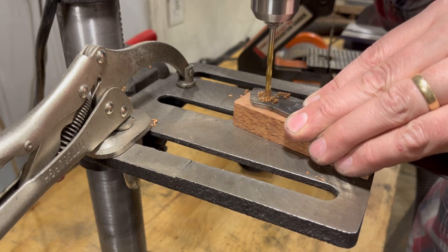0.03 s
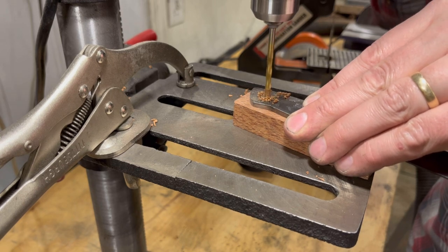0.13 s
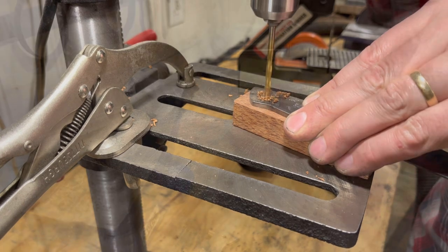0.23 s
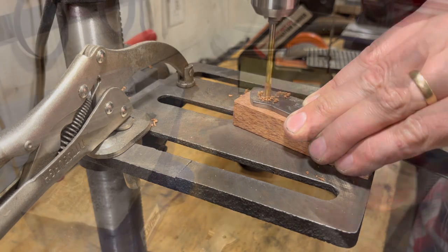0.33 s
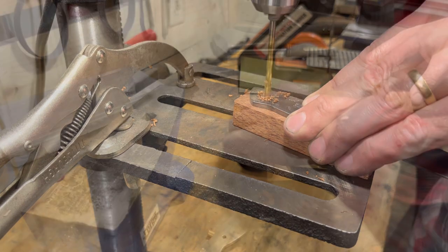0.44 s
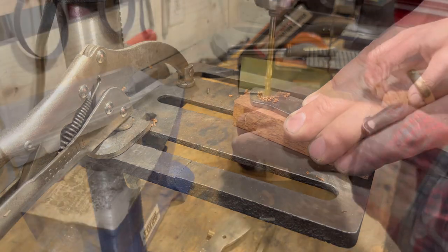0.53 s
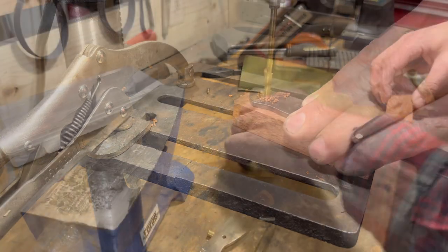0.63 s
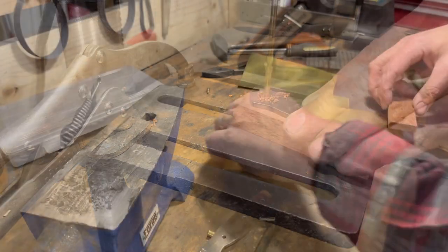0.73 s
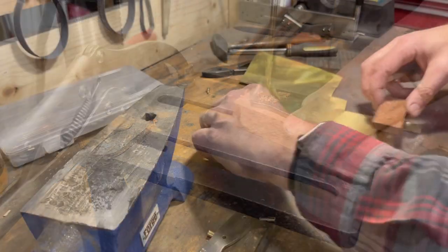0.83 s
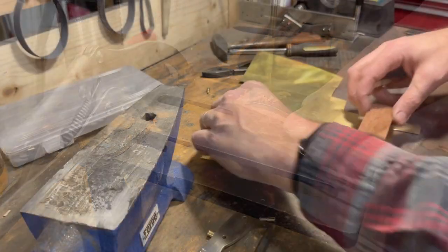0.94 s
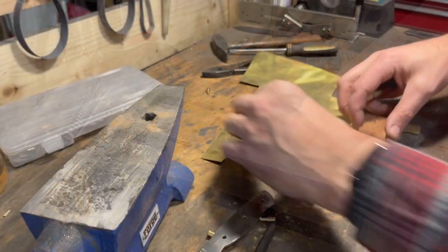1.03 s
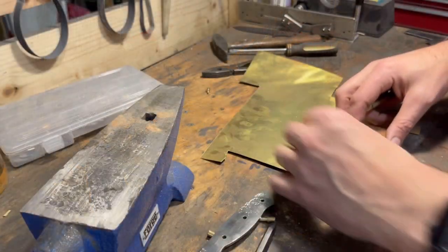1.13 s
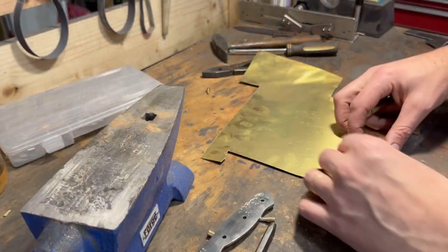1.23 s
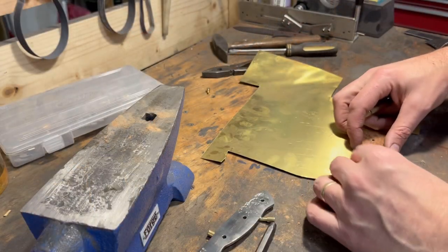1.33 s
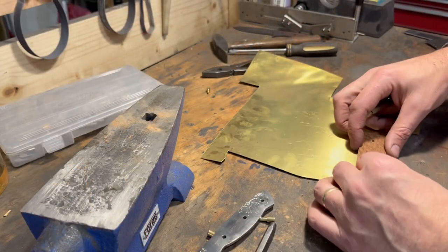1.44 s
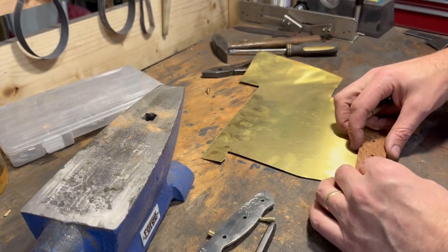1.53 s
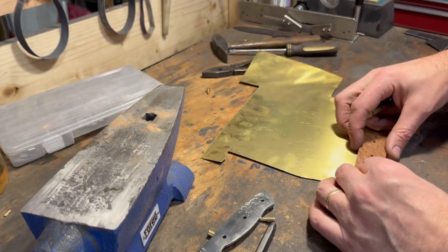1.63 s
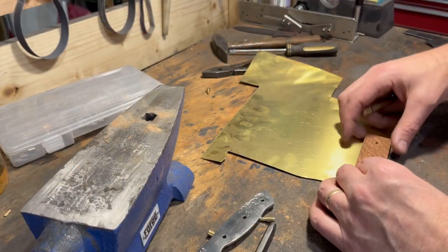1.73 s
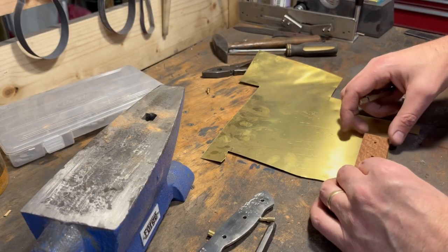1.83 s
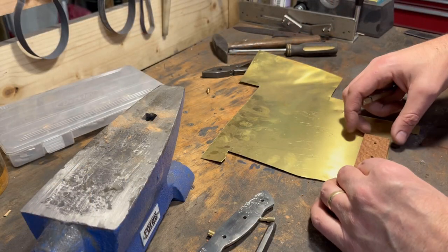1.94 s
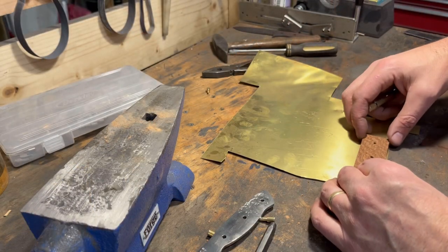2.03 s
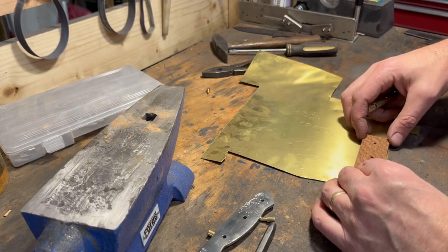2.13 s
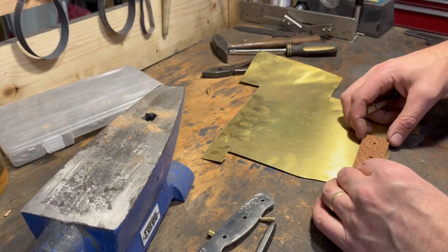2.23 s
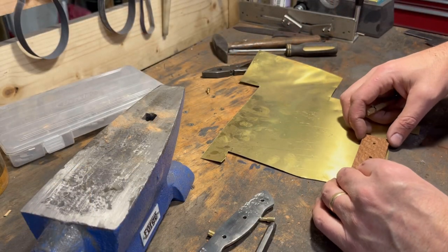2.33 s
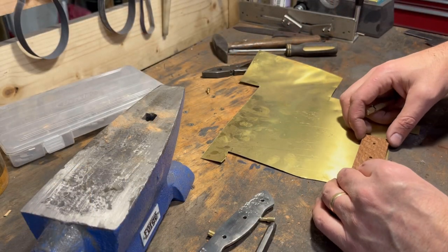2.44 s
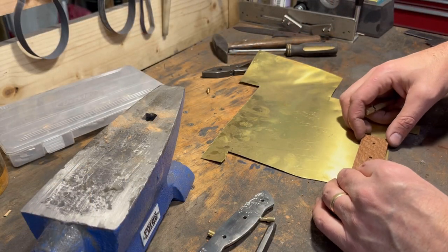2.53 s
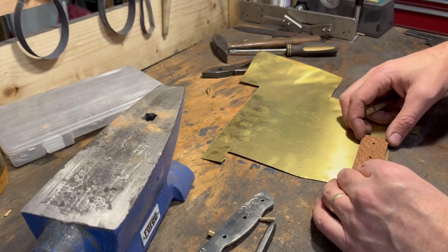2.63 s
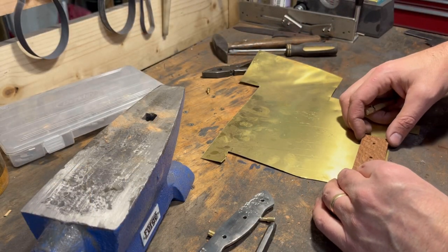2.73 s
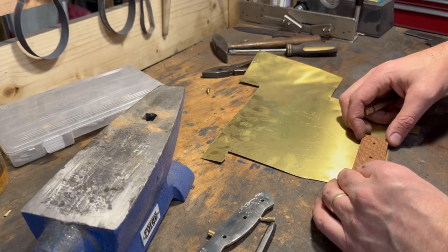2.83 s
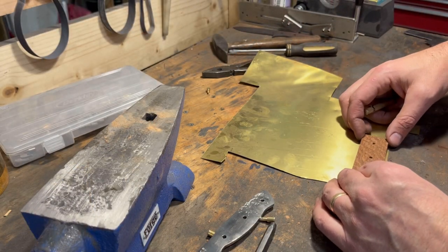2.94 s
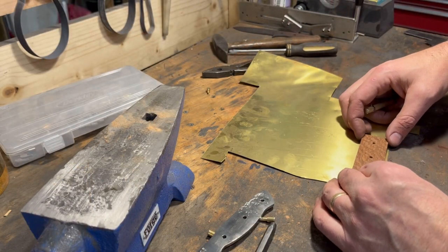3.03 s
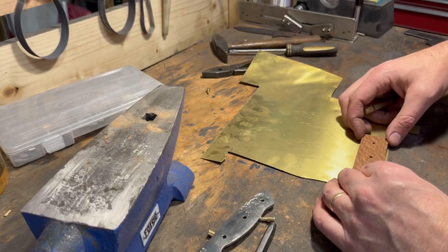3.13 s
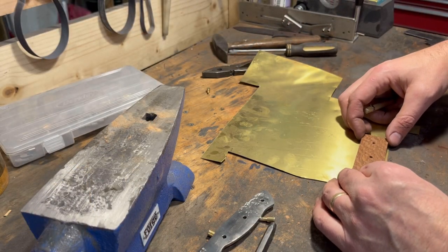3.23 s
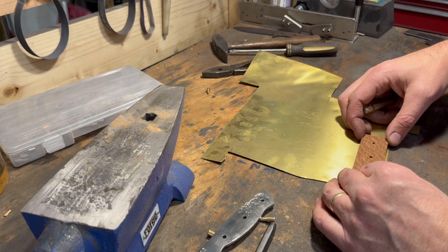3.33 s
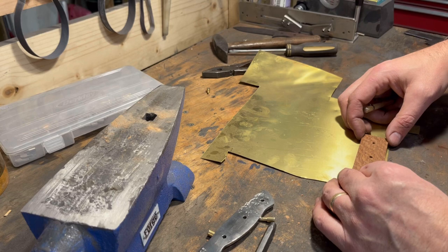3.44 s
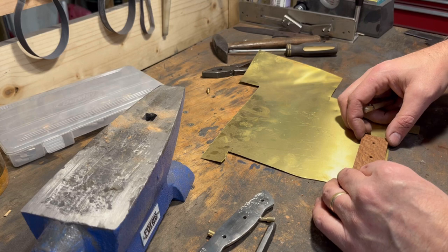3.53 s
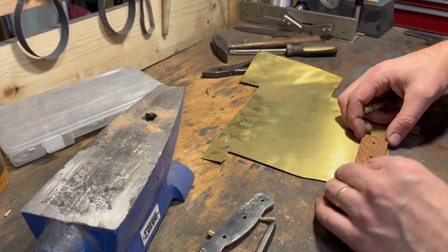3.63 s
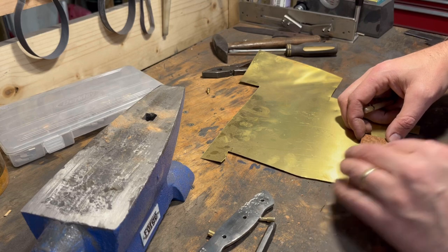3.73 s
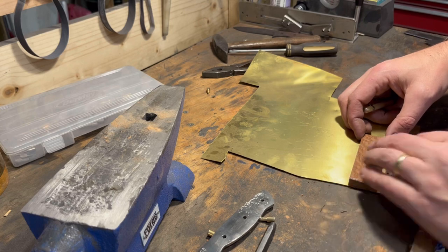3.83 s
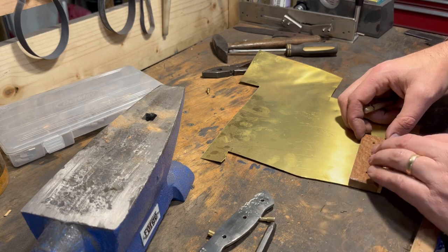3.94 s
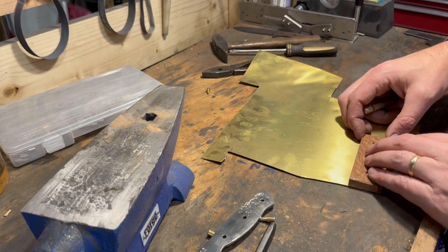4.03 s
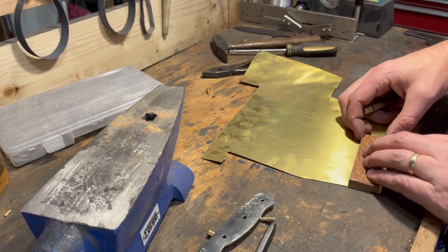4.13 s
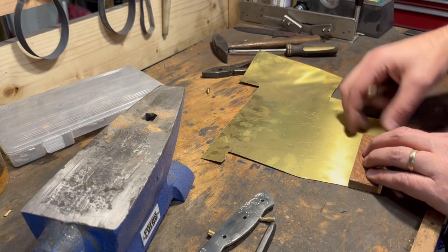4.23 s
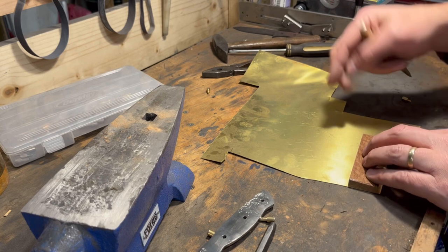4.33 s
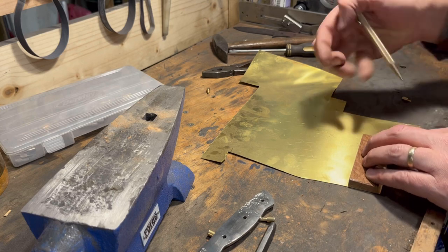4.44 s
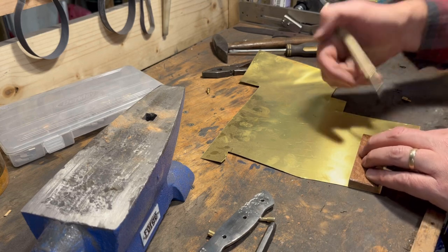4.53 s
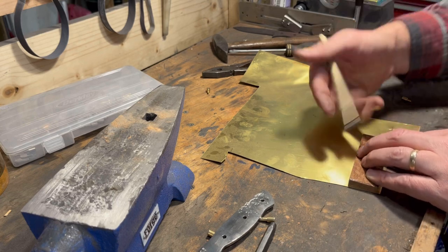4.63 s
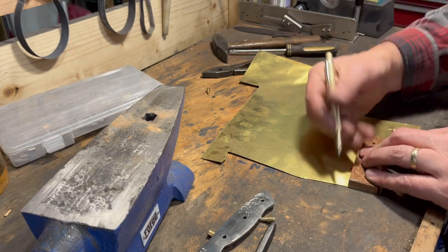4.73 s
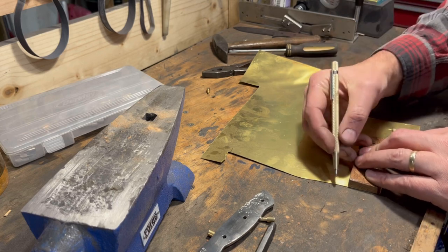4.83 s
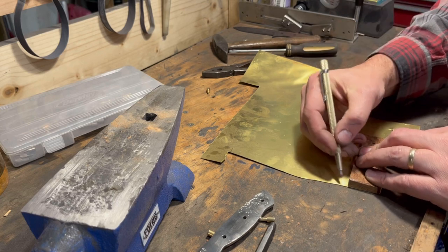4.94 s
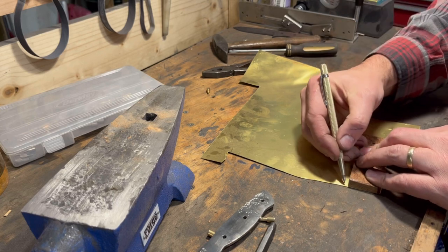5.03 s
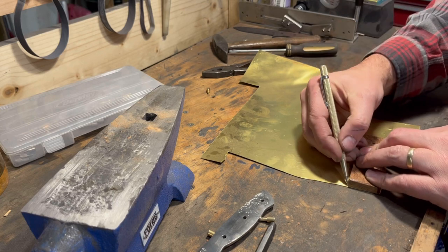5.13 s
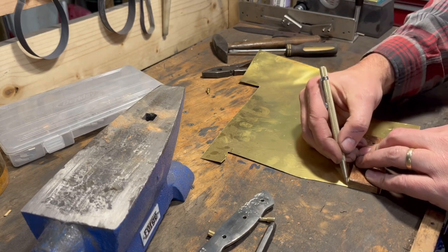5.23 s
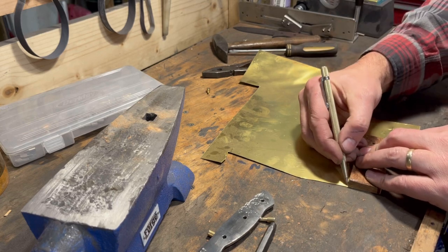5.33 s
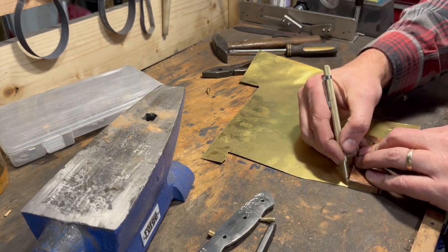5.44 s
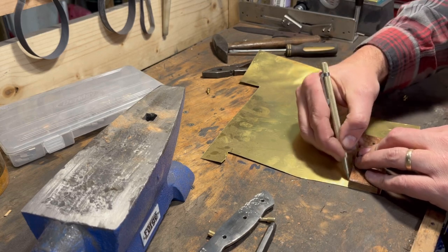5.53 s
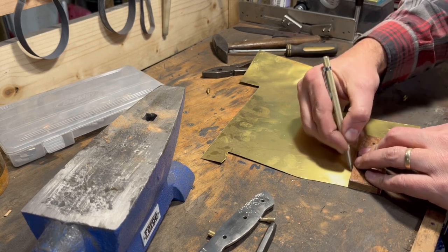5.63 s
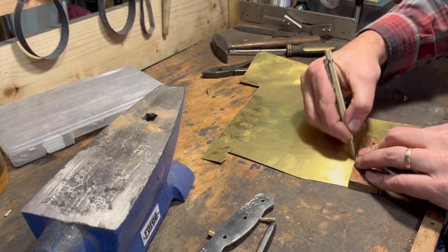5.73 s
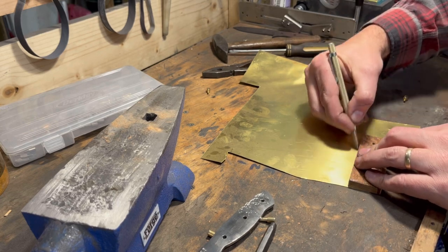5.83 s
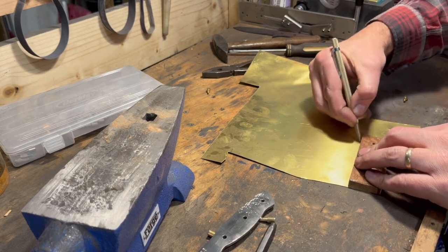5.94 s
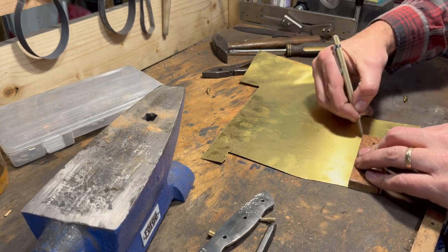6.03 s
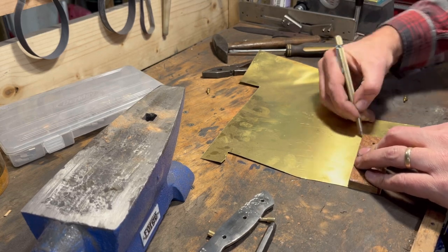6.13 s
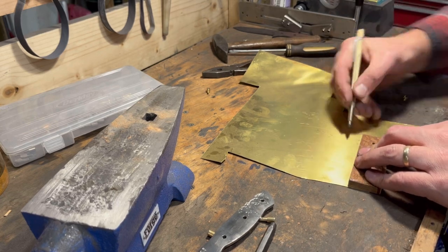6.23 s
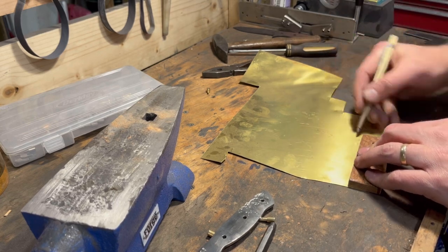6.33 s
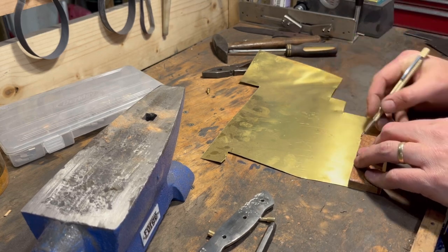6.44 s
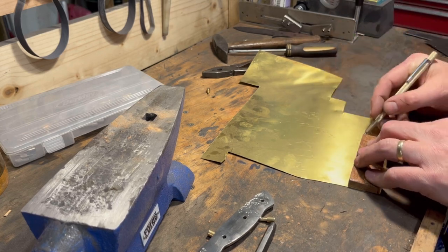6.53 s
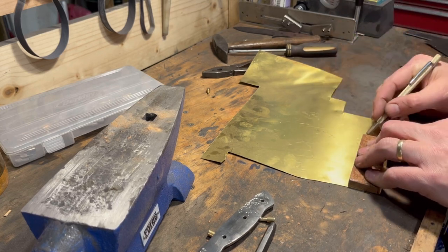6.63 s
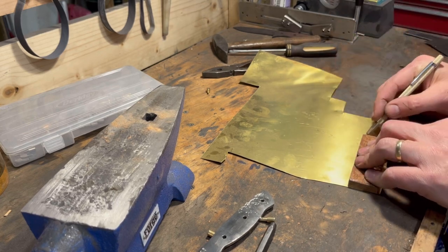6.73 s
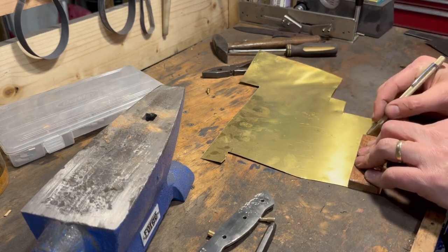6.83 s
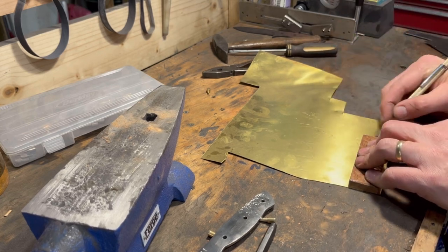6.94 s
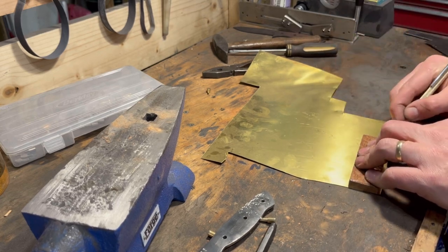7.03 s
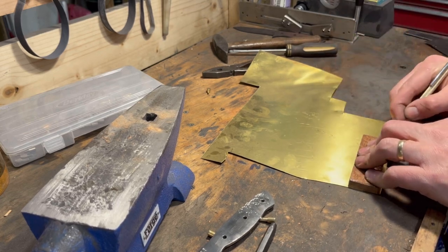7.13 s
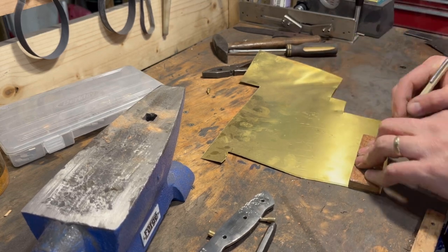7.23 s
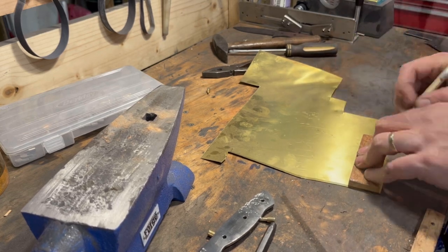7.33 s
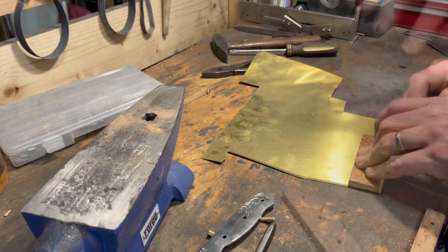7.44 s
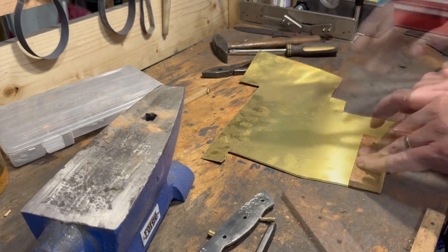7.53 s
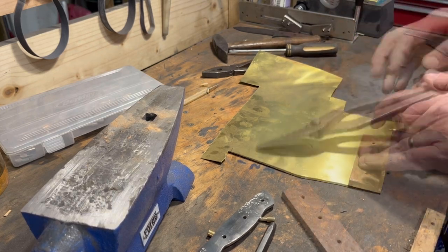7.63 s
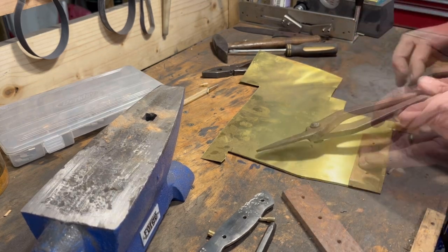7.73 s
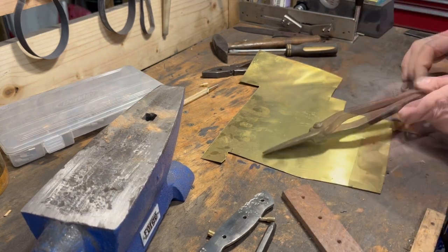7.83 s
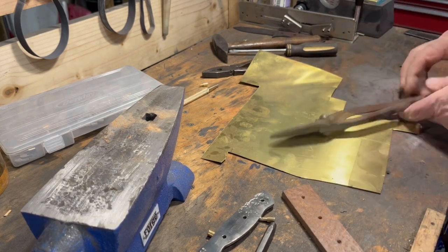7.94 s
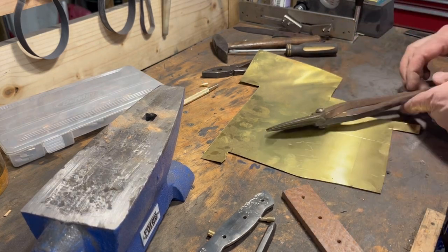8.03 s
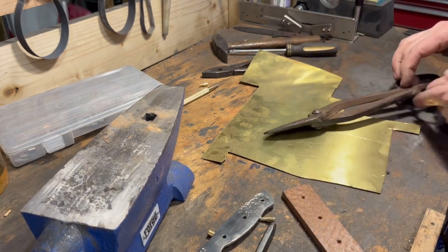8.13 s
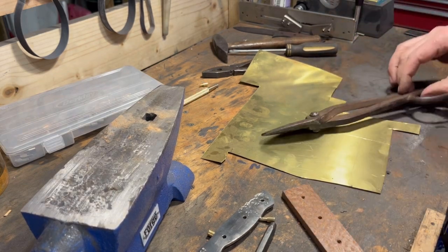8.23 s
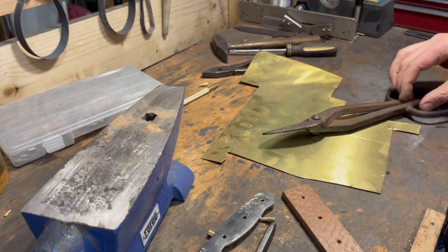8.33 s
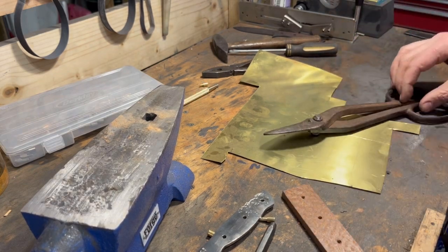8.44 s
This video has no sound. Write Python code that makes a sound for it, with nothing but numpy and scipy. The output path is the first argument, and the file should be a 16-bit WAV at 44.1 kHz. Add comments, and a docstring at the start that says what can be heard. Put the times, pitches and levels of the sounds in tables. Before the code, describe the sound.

In a quiet workshop, a small drill press drones and growls while its bit crunches through a wooden block, then cuts off sharply. Soft knocks and shuffles follow on the bench, a steel scriber scrapes and squeals briefly on brass, the block is tapped and slid, something drags harshly over the sheet, and a tool lands with a loud clunk. Close stereo microphone, short room echo.

```python
"""A small drill press hums and bites into a wooden block, then stops short: tones, filtered noise, grains.
Knocks ring block and bench modes; two clinks ring steel and a brass sheet.
Hands shift things about, a steel scriber scrapes and squeals on brass, something drags over the sheet:
friction grains through spectra and resonators. Cloth swishes as shaped noise.
A quiet workshop with echoes and still air, heard by a pair of microphone ports."""
import sys
import numpy as np
from scipy import signal
from scipy.fft import rfft, irfft, next_fast_len
from scipy.io import wavfile

SR = 44100
rng = np.random.default_rng(int(sys.argv[2]) if len(sys.argv) > 2 else 0)


def generate_wav(sig):
    """Save sig (samples, or channels by samples) to the path in sys.argv[1] as 16-bit PCM at SR."""
    pcm = np.round(np.clip(np.atleast_2d(sig).T, -1, 1) * 32767).astype(np.int16)
    wavfile.write(sys.argv[1], SR, pcm)


N = 373968
SIZE = next_fast_len(N + SR)  # transform length

# Still room air. Each row: frequency in Hz, relative density in dB per Hz.
AIR_SPECTRUM = [(25, -29.5), (65, -2.5), (147, -13.5), (293, -24), (446, -29), (849, -33.5), (1040, -45.5),
                (1730, -36.5), (2010, -48.5), (5000, -63.5), (9000, -72), (15200, -52.5), (17000, -69)]
# Air level: shared part in dB, unshared part in dB.
AIR_LEVELS_DB = (-56, -51.5)
# Room decay. Each row: frequency in Hz, t60 in s at scale 1.
ROOM_T60 = [(80, 0.13), (250, 0.3), (600, 0.48), (1500, 0.12), (4000, 0.32), (10000, 0.065)]
ROOM_DB = -6

# Left-right likeness of the ports. Each row: frequency in Hz, likeness 0 to 1.
LIKENESS = [(60, 0.97), (130, 1), (290, 0.86), (640, 0.57), (1400, 0.45), (3100, 0.74)]
# The same above the bass and mids. Each row: frequency in Hz, likeness 0 to 1.
TREBLE_LIKENESS = [(6000, .95), (16000, .97)]
# Level difference. Each row: frequency in Hz, left minus right in dB.
PORT_LEAN = [(60, 0.5), (110, -3.5), (200, -2), (380, -1.5), (700, 1.5), (1290, 0), (2380, 0), (4400, 5.5),
             (8120, 0), (15000, -0.5)]
# Phase difference. Each row: frequency in Hz, lead of left in radians.
PORT_LEAD = [(0, 0), (780, .4), (1600, -.9), (2100, -.1), (4500, .3), (5250, -.3), (5900, -2.2),
             (6600, -3.15), (8350, -6.2), (10000, -6.4), (11800, -9.3), (13800, -9.5), (14600, -12.3),
             (16000, -12.7)]
SELF_NOISE_DB, LOW_CUT_HZ, HIGH_CUT_HZ = -87, 59.5, 16300

# Cloth colour. Each row: frequency in Hz, relative density in dB per Hz.
CLOTH_SPECTRUM = [(3000, -11), (6000, -6), (9000, -1.5), (13000, 0), (16000, -6.5)]
# Cloth swishes. Each row: start in s, rise in s, fall in s, level in dB.
SWISHES = [(4.05, 0.47, .07, -68), (4.583, 0.039, 0.12, -68), (4.76, 0.027, 0.2, -63)]

# Bench rumble colour. Each row: frequency in Hz, relative density in dB per Hz.
RUMBLE_SPECTRUM = [(25, -46), (50, -19), (85, 4), (130, -0.5), (250, -6.5), (400, -15), (16000, -49)]
# Block rubbing colour. Each row: frequency in Hz, relative density in dB per Hz.
RUBBING_SPECTRUM = [(100, -16), (300, 5), (600, 2), (1000, 4), (1600, -5.5), (2600, -14), (16000, -90)]
# Skin and brass rustle colour. Each row: frequency in Hz, relative density in dB per Hz.
RUSTLE_SPECTRUM = [(600, -34), (1500, -2.5), (2500, -1), (4500, -4.5), (5600, -4.5), (7600, -4.5),
                   (9000, -10.5), (12000, -9), (16000, -20.5)]
# Hands slide things. Each row: start in s, rise in s, fall in s,
# drive of bench rumble, block rubbing and skin and brass rustle in dB.
SLIDES = [(1.162, 0.0031, 0.044, -65.5, -65, -63), (1.211, 0.0051, 0.093, -42.5, -49, -60.5),
          (1.25, 0.098, 0.28, -63, -81, -68), (1.6, 0.096, 0.071, -81, -67, -63),
          (1.74, 0.058, 0.19, -68, -75, -62), (1.9, 0.058, 0.12, -62.5, -53, -68),
          (2.193, 0.065, 0.027, -78.5, -55.5, -67), (2.428, 0.037, .035, -88, -69, -75.5),
          (2.7, 0.052, 0.03, -90, -82, -75.5), (2.889, 0.05, 0.039, -88, -75, -76),
          (3.009, 0.056, 0.018, -74, -66, -75), (3.573, 0.066, 0.052, -78, -60, -63),
          (4.125, 0.015, 0.17, -58, -71, -68), (4.799, 0.0065, 0.27, -58, -65, -69),
          (5.427, 0.23, 0.48, -40, -39, -58), (5.6, 0.18, 0.206, -44.5, -47, -58),
          (5.955, 0.038, 0.045, -65.5, -45.5, -55), (6.09, 0.059, 0.071, -60, -58.5, -62.5),
          (6.873, 0.049, 0.14, -50, -39, -55), (6.93, 0.082, 0.11, -34.5, -37.5, -70),
          (7.123, 0.056, 0.0092, -49, -38.5, -54), (7.24, 0.03, 0.23, -58, -56.5, -64),
          (7.4, 0.31, 0.043, -64, -65, -63), (7.646, 0.0415, 0.15, -36, -33, -44),
          (7.8, 0.04, 0.091, -36, -37.5, -45), (7.86, 0.12, 0.1, -43, -46.5, -50),
          (8.199, 0.087, 0.0078, -49.5, -53, -53), (8.42, 0.0301, 0.0279, -36.5, -54, -83)]
SWELL_POWER = 1.125  # roundness of a swell
# Loose things shake on after a knock: levels against its thud, block and crack.
SHAKE_RUMBLE_DB, SHAKE_RUBBING_DB, SHAKE_RUSTLE_DB = -21.5, -22, -32.5
SHAKE_RISE_S, SHAKE_FADE_DB_PER_S = 0.004, 229
LINGER_DB, LINGER_FADE_DB_PER_S = -17, 47.5  # slower remainder

# Scriber strokes, one list each. Each row: time in s, pressure in dB.
SCRIBER_STROKES = [
    [(5.42, -97), (5.5, -64), (5.67, -55), (5.9, -71), (5.952, -82.5), (5.964, -51.5), (6.01, -57),
     (6.04, -75), (6.08, -84)],
]
# Scriber resonances. Each row: centre in Hz, width in Hz, relative level in dB.
SCRIBER_RING = [(4320, 500, -2.5), (7070, 280, -4), (10720, 570, -2)]
# Drags over the sheet, one list each. Each row: time in s, pressure in dB.
DRAG_STROKES = [
    [(7.652, -70), (7.665, -50.5), (7.72, -40.5), (7.79, -63), (7.815, -45), (8.04, -97), (8.07, -73)],
]
# Drag resonances. Each row: centre in Hz, width in Hz, relative level in dB.
DRAG_RING = [(1950, 160, 0), (2520, 140, -1), (3220, 260, -2), (4250, 260, -5)]
# Scriber tip squeals. Each row: start in s, rise in s, fall in s, pitch in Hz, level in dB.
SQUEALS = [(5.45, 0.19, 0.064, 2440, -54), (5.66, 0.039, 0.19, 2170, -47.5),
           (5.97, 0.032, 0.041, 2240, -52)]
SQUEAL_WIDTH_HZ = 170  # sets both ring times

# Knocks. Each row: time in s, drive of block, bench thud and crack in dB,
# favoured thud pitch in Hz, favoured block pitch in Hz.
KNOCKS = [(1.219, -31, -64, -38, 120, 2500), (1.979, -49, -49, -42, 113.7, 1033),
          (3.055, -45, -46, -82, 176, 552), (4.126, -41, -42.5, -50, 182, 613),
          (4.195, -41.5, -40.5, -50.5, 96.3, 494), (4.27, -46.5, -41.5, -74, 154, 610),
          (4.375, -52, -49.5, -47, 132.7, 423), (4.53, -47.5, -51.5, -48.5, 116.6, 720),
          (4.539, -55, -31.5, -56, 94, 551), (4.761, -45.5, -36.5, -62, 127, 616),
          (4.799, -31, -28.5, -37.5, 95, 915), (5.114, -34.5, -71, -53, 134, 690),
          (5.195, -23.5, -28, -35.5, 217, 1110), (5.384, -38.5, -41, -83, 175, 417),
          (6.138, -40, -40, -42, 109.7, 788), (6.366, -34, -51, -36, 140, 870),
          (6.389, -19, -67, -28.5, 234, 850), (6.432, -62, -24.5, -51, 94.5, 732),
          (6.484, -31.5, -48, -65, 105, 664), (6.567, -18, -26, -29, 283, 695),
          (6.605, -29.5, -35, -43.5, 330, 810), (6.887, -35.5, -35, -38, 127, 740),
          (7.146, -31, -40, -42, 111, 1050), (7.166, -17, -17.5, -16, 319, 1530),
          (7.172, -17, -14.5, -20, 195, 840), (7.656, -33, -78, -21.5, 121, 855),
          (7.991, -47, -57, -23.5, 200, 2200), (8.044, -31, -34, -56, 100.7, 720),
          (8.1053, -23, -35.5, -24.5, 298, 2130), (8.16, -59, -30, -64, 118.5, 500),
          (8.263, -5, -15, -10, 222.7, 1040), (8.265, -12, -5, -45, 200, 545),
          (8.412, -23, -51.5, -32, 150, 1810), (8.435, -13.5, -25, -27.5, 206, 1350),
          (8.445, -16.5, -20.5, -71, 145, 724)]
# Wooden block modes. Each row: frequency in Hz, relative strength in dB, t60 in s.
BLOCK_MODES = [(322, 6.5, 0.048), (520, 2, 0.026), (651, -6, 0.051), (716, 3, 0.035), (820, 3, 0.024),
               (1031, -0.5, 0.038), (1206, -7, 0.031), (1490, 0, 0.014), (1870, -3.5, 0.02),
               (2296, -0.5, 0.019), (3100, -6.5, 0.0085), (4370, 3.5, 0.024)]
# Bench modes. Each row: frequency in Hz, relative strength in dB, t60 in s.
BENCH_MODES = [(76.2, 2, 0.21), (101.5, 2.5, 0.13), (119.3, -2.5, .1), (144.9, -1.5, 0.1), (176, 3, 0.0678),
               (231.4, -3.5, 0.074), (263.7, -2, 0.23), (342, 4.5, 0.077)]
# Steel tool modes. Each row: frequency in Hz, relative strength in dB, t60 in s.
STEEL_MODES = [(8479, 0, .16), (10200, -4, .11), (11280, -2, .12), (14200, -5, .1)]
# A steel tool lands on the sheet. Each row: time in s, steel peak in dB, sheet peak in dB.
CLINKS = [(7.173, -43, -40), (8.268, -35, -23)]
SHEET_HZ, SHEET_T60_S, SHEET_DB_PER_OCTAVE = (600, 3600), 0.4, -11  # span of its dense modes
CONTACT_S, CRACK_S = 0.0037, 0.0045  # e-folding times of block push and crack
FIRST_TOUCH = 7.9  # opening click against the scuffle after it
PAD_CYCLES = 0.83  # bench push and rebound, in periods of the thud
SOFTNESS = 4.1  # low-pass corner of a blow over its block pitch

# Motor and spindle tones. Each row: frequency in Hz, typical level in dB rms.
MOTOR_TONES = [(119.5, -37.5), (240.5, -40), (649.5, -44.5), (768.7, -31), (840, -50), (1008, -45)]
# Housing rumble colour. Each row: frequency in Hz, relative density in dB per Hz.
HOUSING_SPECTRUM = [(30, -6), (60, -7), (90, -1), (180, -14), (480, -6.5), (650, -2.5), (1400, -14.5),
                    (2500, -21.5), (16000, -51.5)]
# Feed pressure, as housing rumble. Each row: time in s, level in dB.
FEED = [(0.0, -39), (0.11, -33.5), (0.16, -33.5), (0.3, -34.5), (0.44, -36), (0.634, -30), (0.78, -31.5),
        (0.876, -33.5), (1.16, -35)]
# Cutting grit colour. Each row: frequency in Hz, relative density in dB per Hz.
CUTTING_SPECTRUM = [(300, -29.5), (1000, -7.5), (2500, 1), (4500, 1), (6500, 3.5), (9000, -8.5),
                    (12000, -13.5), (16000, -20.5)]
# Cutting grit drive. Each row: time in s, level in dB.
GRIT = [(0, -41.5), (.07, -45), (.13, -50.5), (.16, -31), (.272, -45.5), (.295, -24), (.35, -31),
        (.434, -39.5), (.57, -40), (.59, -33), (.78, -37), (.806, -28), (.886, -43.5), (1.16, -44.5)]
# Chips break. Each row: time in s, level before fading in dB, e-folding time in s, pitch in Hz.
CHIPS = [(0.089, -23, 0.0065, 1260), (0.163, -25, 0.01, 2950), (0.352, -33, 0.014, 2050),
         (0.603, -33.5, 0.021, 1220), (0.678, -25.5, 0.0092, 676), (0.926, -33.5, 0.0046, 7200),
         (0.957, -36.5, 0.0055, 7150), (0.99, -31.5, 0.0047, 7100), (1.023, -30.5, 0.0035, 7500),
         (1.065, -30.5, 0.0096, 5600)]
# Bit resonances. Each row: centre in Hz, width in Hz.
BIT_RING = [(4111, 26), (4254, 16), (4430, 20), (4994, 27), (5388, 16)]
BIT_RING_DB = 17.5  # times the square of the grit gain
GROWL_HZ, GROWL_WIDTH_HZ, GROWL_DB = 343.8, 73, -40  # level at mean feed
GROWL_DB_PER_FEED_DB = 1.66
DRILL_STOP_S, STOP_FADE_S = 1.158, 0.00147


def from_db(db):
    """Gain of a level in dB."""
    return 10 ** (np.asarray(db) / 20)


def rms_one(x):
    """Scale to rms 1."""
    return x / np.sqrt(np.mean(x ** 2) + 1e-20)


def noise():
    """White noise of scene length."""
    return rng.standard_normal(N)


def in_time(rows):
    """Gain in time from rows of s and dB, near silent outside them."""
    time_s, level_db = np.transpose(rows)
    return from_db(np.interp(np.arange(N) / SR, time_s, level_db, left=-150, right=-150))


def at_hz(points, hz):
    """Table read on a log-frequency axis."""
    table_hz, values = np.array(points).T
    return np.interp(np.log(hz + 1), np.log(table_hz + 1), values)


def bins_hz():
    """Frequencies of the transform."""
    return np.arange(SIZE // 2 + 1) * SR / SIZE


def coloured(x, spectrum):
    """Source shaped by a spectrum; rms 1."""
    shaped = rfft(x, SIZE) * from_db(at_hz(spectrum, bins_hz()))
    return rms_one(irfft(shaped, SIZE)[:N])


def filtered(x, order, corner_hz, kind="low"):
    """Butterworth filter."""
    return signal.sosfilt(signal.butter(order, corner_hz, kind, fs=SR, output="sos"), x)


def drift(rate_hz):
    """Slow random wander, rms 1: noise through two equal poles, at SR / 40."""
    r = np.exp(-80 * np.pi * rate_hz / SR)
    slow = signal.lfilter([1], [1, -2 * r, r * r], rng.standard_normal(N // 40 + 2002))
    slow = rms_one(slow[2000:])  # settled part
    return np.interp(np.arange(N) / 40, np.arange(len(slow)), slow)


def grains(per_s, spread_db):
    """Random friction clicks of uneven size and either sign."""
    sizes = from_db(spread_db * np.minimum(rng.exponential(1, N), 5))
    signs = rng.choice([-1, 1], N)
    return sizes * signs * (rng.random(N) < per_s / SR)


def ring(x, hz, t60_s):
    """Two-pole resonator: a unit click starts a decaying sine of initial height 1."""
    r, w = from_db(-60 / (t60_s * SR)), 2 * np.pi * hz / SR
    return signal.lfilter([0, np.sin(w)], [1, -2 * r * np.cos(w), r * r], x + 1e-18)


def add(out, start_s, piece):
    """Lay a short sound into the track."""
    at = round(start_s * SR)
    out[at:at + len(piece)] += piece[:N - at]


def swell(rise_s, fall_s):
    """Rounded rise to 1 and rounded fall."""
    rise = np.linspace(0, 1, round(rise_s * SR))
    fall = np.linspace(1, 0, round(fall_s * SR))
    return np.clip(np.sin(np.pi / 2 * np.r_[rise, fall]), 0, 1) ** SWELL_POWER


def favoured(modes, centre_hz, slope_db):
    """The spot struck favours modes near one pitch."""
    return [(hz, db - slope_db * np.log2(hz / centre_hz) ** 2, t60_s) for hz, db, t60_s in modes]


def struck(modes, contact_s, detune, size, heavy=False):
    """One blow: a push drives modes of chance strength and pitch shift; peak 1."""
    t = np.arange(size) / SR
    if heavy:  # rounded push and rebound
        push = np.sin(2 * np.pi * np.minimum(t / contact_s, 1))
    else:  # uneven scuffle; a small body radiates no deep bass
        push = rng.standard_normal(size) * np.exp(-t / max(contact_s, 1e-4))
        push[0] = FIRST_TOUCH
        push = signal.lfilter([1, -1], [1, -.96], push)
    out = np.zeros(size)
    for hz, db, t60_s in modes:
        strength, shift = rng.standard_normal(2)
        out += from_db(db + 2.1 * strength) * ring(push, hz * (1 + detune * shift), t60_s)
    return out / np.max(np.abs(out))


def still_air():
    """Steady coloured noise; rows are shared and unshared parts."""
    return np.array([from_db(db) * coloured(noise(), AIR_SPECTRUM) for db in AIR_LEVELS_DB])


def echo_response(t60_scale):
    """Transform of an echo pattern: octave noise bands, each dying at its own rate."""
    t, out = np.arange(SR // 2) / SR, 0
    for low_hz in 35 * 2. ** np.arange(9):
        band = filtered(rng.standard_normal(len(t)), 2, [low_hz, 2 * low_hz], "band")
        band = band * from_db(-60 * t / (t60_scale * at_hz(ROOM_T60, 1.4 * low_hz)))
        out = out + band * np.sqrt(low_hz / SR * 2 / np.sum(band ** 2))  # energy by bandwidth
    return rfft(out, SIZE)


def sleeve():
    """Cloth swishes: bright noise under rounded swells."""
    gain = np.zeros(N)
    for start_s, rise_s, fall_s, db in SWISHES:
        add(gain, start_s, from_db(db) * swell(rise_s, fall_s))
    return from_db(2.2 * drift(26)) * gain * coloured(noise(), CLOTH_SPECTRUM)


def movement():
    """Gains of rumble, rubbing and rustle from slides and from shaking after knocks."""
    gains, t = np.zeros((3, N)), np.arange(SR // 2) / SR
    fade = from_db(-SHAKE_FADE_DB_PER_S * t) + from_db(LINGER_DB - LINGER_FADE_DB_PER_S * t)
    shake = np.minimum(t / SHAKE_RISE_S, 1) * fade
    for start_s, rise_s, fall_s, *levels_db in SLIDES:
        for gain, db in zip(gains, levels_db):
            add(gain, start_s, from_db(db) * swell(rise_s, fall_s))
    for start_s, block_db, thud_db, crack_db, *_ in KNOCKS:
        levels_db = (thud_db + SHAKE_RUMBLE_DB, block_db + SHAKE_RUBBING_DB,
                     crack_db + SHAKE_RUSTLE_DB)
        for gain, db in zip(gains, levels_db):
            add(gain, start_s, from_db(db) * shake)
    return gains


def hands():
    """Noise rumbles the bench; friction grains rub the block's modes and rustle."""
    rumble_gain, rubbing_gain, rustle_gain = movement()
    rough = grains(1500, 1.4)
    rumble = coloured(noise(), RUMBLE_SPECTRUM)
    modes = favoured(BLOCK_MODES, centre_hz=804, slope_db=6)
    body = sum(from_db(db) * ring(rough, hz, t60_s) for hz, db, t60_s in modes)
    rubbing = 0.27 * rms_one(body) + 0.57 * coloured(rough, RUBBING_SPECTRUM)
    rustle = coloured(grains(6000, 0.58) + 1.23 * rough, RUSTLE_SPECTRUM)
    out = from_db(2.5 * drift(24)) * rumble_gain * rumble
    out += from_db(2.92 * drift(29)) * rubbing_gain * rubbing
    return out + from_db(3.11 * drift(17)) * rustle_gain * rustle


def scratch(strokes, resonances):
    """Chatter grains over brass sing in a few resonances that come and go."""
    pressure = sum(in_time(stroke) for stroke in strokes)
    chatter = grains(800, 4)
    sung = np.zeros(N)
    for hz, width_hz, db in resonances:
        sung += from_db(db + 3 * drift(9)) * rms_one(ring(chatter, hz, 2.2 / width_hz))
    return from_db(-4 + 3 * drift(20)) * pressure * sung


def squeals():
    """Stick-slip grains ring one narrow resonance at a time, through two resonators."""
    out, chatter = np.zeros(N), grains(500, 4)
    for start_s, rise_s, fall_s, hz, db in SQUEALS:
        shape = swell(rise_s, fall_s)
        push = chatter[round(start_s * SR):][:len(shape)]
        sung = ring(ring(push, hz, 3.3 / SQUEAL_WIDTH_HZ), hz, 1 / SQUEAL_WIDTH_HZ)
        add(out, start_s, from_db(db) * shape * rms_one(sung))
    return out


def knocks():
    """Each knock rings block modes under a dry noise crack; the heavy bench answers late."""
    out, t = np.zeros(N), np.arange(9000) / SR
    crack_shape = np.exp(-t / CRACK_S) * (1 - np.exp(-t / 0.0012))
    for start_s, block_db, thud_db, crack_db, thud_hz, block_hz in KNOCKS:
        crack = filtered(rng.standard_normal(len(t)), 2, 1300, "high")
        crack = filtered(crack, 1, 3500) * crack_shape
        block_modes = favoured(BLOCK_MODES, block_hz, slope_db=9.5)
        block = struck(block_modes, CONTACT_S, 0.065, len(t))
        block = filtered(block, 2, SOFTNESS * block_hz)
        bench_modes = favoured(BENCH_MODES, thud_hz, slope_db=27.5)
        thud = struck(bench_modes, PAD_CYCLES / thud_hz, 0.041, len(t), heavy=True)
        add(out, start_s, from_db(block_db) * block + from_db(crack_db) * crack)
        add(out, start_s + 0.002, -from_db(thud_db) * thud)
    return out


def clinks():
    """Steel modes ring from a short contact, dense sheet modes from a long rattling one."""
    out, size = np.zeros(N), 9000
    pitches_hz = np.linspace(*SHEET_HZ, 70) + rng.uniform(-40, 40, 70)
    sheet_modes = [(hz, SHEET_DB_PER_OCTAVE * np.log2(hz / SHEET_HZ[0]), SHEET_T60_S)
                   for hz in pitches_hz]
    for start_s, steel_db, sheet_db in CLINKS:
        add(out, start_s, from_db(sheet_db) * struck(sheet_modes, 0.045, 0, 2 * size))
        add(out, start_s, from_db(steel_db) * struck(STEEL_MODES, 0.0005, 0, size))
    return out


def motor():
    """Motor and spindle sines wavering in level and phase."""
    t, out = np.arange(N) / SR, np.zeros(N)
    for hz, db in MOTOR_TONES:
        gain = np.sqrt(2) * from_db(db + 1.6 * drift(7))
        out += gain * np.sin(2 * np.pi * hz * t + .4 * drift(7))
    return out


def housing():
    """Housing rumble follows the feed; the table's resonance growls under load."""
    feed_db = np.interp(np.arange(N) / SR, *np.transpose(FEED))
    rumble = from_db(feed_db + 2.74 * drift(15)) * coloured(noise(), HOUSING_SPECTRUM)
    growl_db = GROWL_DB + GROWL_DB_PER_FEED_DB * (feed_db - feed_db.mean()) + 2.7 * drift(17)
    growl = rms_one(ring(noise(), GROWL_HZ, 2.7 / GROWL_WIDTH_HZ))
    return rumble + from_db(growl_db) * growl


def chips():
    """Each breaking chip is a fading burst of splinter grains around one pitch."""
    out, t = np.zeros(N), np.arange(3000) / SR
    splinters = grains(4000, 3)
    for start_s, db, crackle_s, hz in CHIPS:
        burst = splinters[round(start_s * SR):][:len(t)]
        burst = rms_one(filtered(burst, 2, [hz / 1.6, hz * 1.6], "band"))
        add(out, start_s, from_db(db) * burst * np.exp(-t / crackle_s) * np.minimum(t / .002, 1))
    return out


def cutting():
    """Grit grains throb at the lowest motor tone; the bit sings with the grit gain squared."""
    gain = in_time(GRIT)
    throb = 1 + .3 * np.sin(2 * np.pi * MOTOR_TONES[0][0] * np.arange(N) / SR)
    bit = sum(rms_one(ring(noise(), hz, 2.2 / width_hz)) for hz, width_hz in BIT_RING)
    out = from_db(BIT_RING_DB) * gain ** 2 * rms_one(bit)
    grit = gain * throb * coloured(grains(3500, 2.2), CUTTING_SPECTRUM)
    # colour shifts as chips pack and clear: each band drifts alone
    for band_hz in ([300, 2400], [2400, 3600], [3600, 6000], [6000, 18000]):
        out += from_db(2.2 * drift(25)) * filtered(grit, 2, band_hz, "band")
    return out


def drill():
    """Motor, housing, chips and cutting, faded out in a moment at the stop."""
    running = np.clip((DRILL_STOP_S - np.arange(N) / SR) / STOP_FADE_S, 0, 1)
    return (motor() + housing() + chips() + cutting()) * running


def friction():
    """All sliding sounds."""
    scraping = scratch(SCRIBER_STROKES, SCRIBER_RING) + scratch(DRAG_STROKES, DRAG_RING)
    return hands() + scraping + squeals() + sleeve()


def scene():
    """Sources, echoes and air; rows are the ports' shared and unshared parts."""
    blows = rfft(knocks() + clinks(), SIZE)
    # spread-out friction differs from port to port
    rubs = rfft([friction(), friction()], SIZE)
    # nearby objects scatter the blows
    near = rubs + [blows, blows * echo_response(0.51)]
    echoes = np.array([echo_response(0.88), echo_response(1)])
    wet = near * (1 + from_db(ROOM_DB) * echoes)
    drilling = drill()
    drilling_pair = [drilling, drill()]
    return irfft(wet, SIZE)[:, :N] + still_air() + drilling_pair


def record(dry):
    """Two ports with level and phase differences, hiss, low cut, rounded peaks, high cut."""
    hz, (shared, scattered) = bins_hz(), rfft(dry, SIZE)
    alike = np.clip(at_hz(LIKENESS + TREBLE_LIKENESS, hz), 0, 1)
    side = np.array([[1], [-1]])  # left, right
    lead_rad = np.interp(hz, *np.transpose(PORT_LEAD))
    ports = np.sqrt((1 + alike) / 2) * shared + np.sqrt((1 - alike) / 2) * scattered * side
    ports = ports * from_db(side * at_hz(PORT_LEAN, hz) / 2) * np.exp(.5j * side * lead_rad)
    out = irfft(ports, SIZE)[:, :N] + from_db(SELF_NOISE_DB) * rng.standard_normal((2, N))
    out = filtered(out, 2, LOW_CUT_HZ, "high")
    rounded = .93 * np.tanh(out / .93)
    return signal.sosfilt(signal.cheby2(12, 70, HIGH_CUT_HZ, fs=SR, output="sos"), rounded)


dry = scene()
out = record(dry)
generate_wav(out)
```